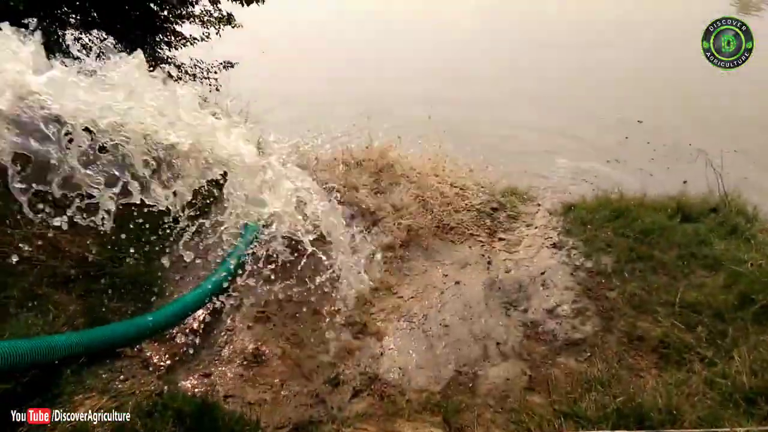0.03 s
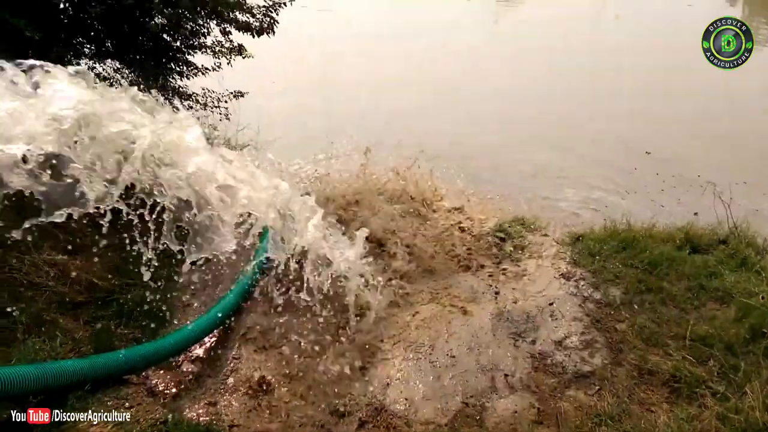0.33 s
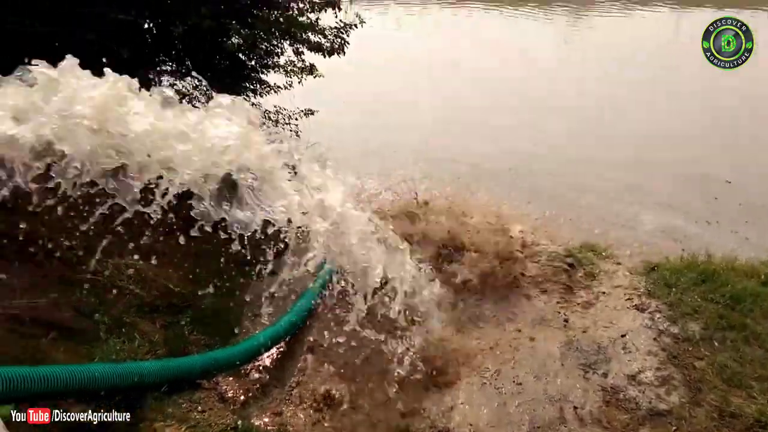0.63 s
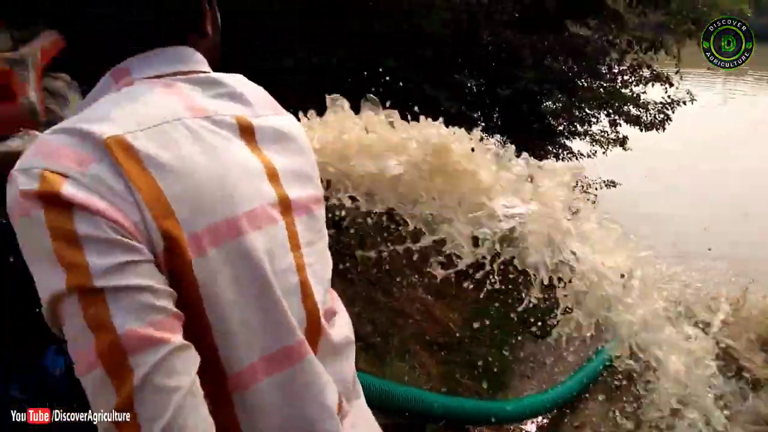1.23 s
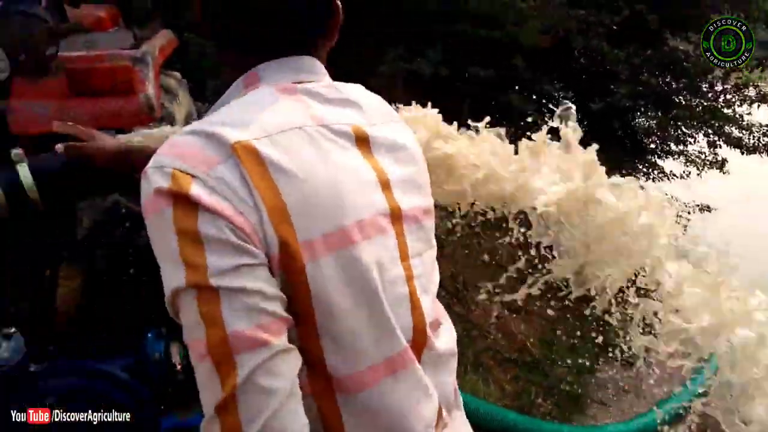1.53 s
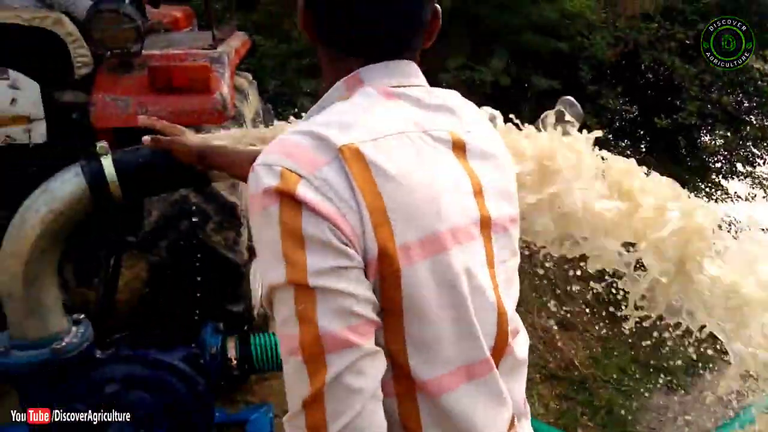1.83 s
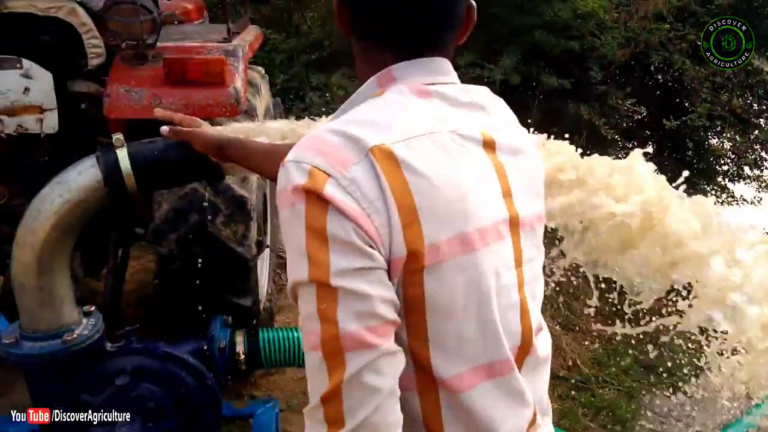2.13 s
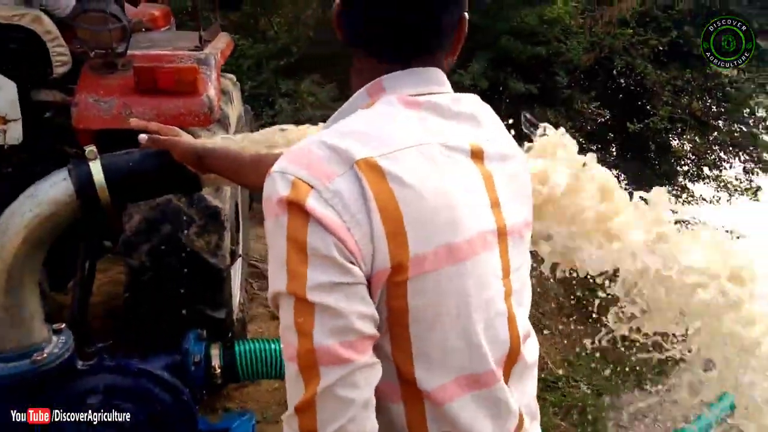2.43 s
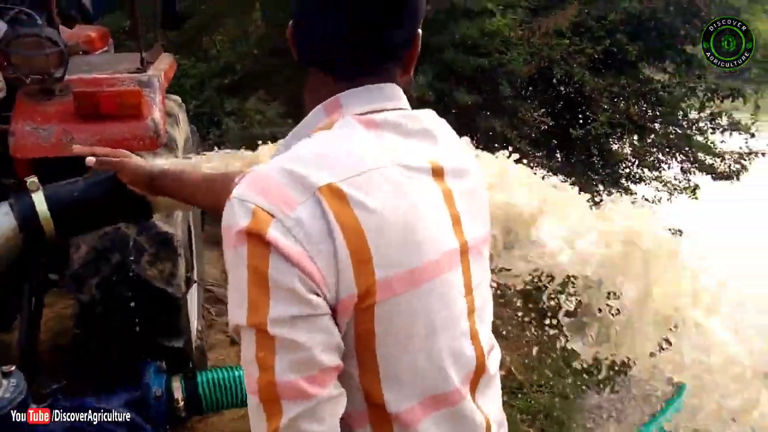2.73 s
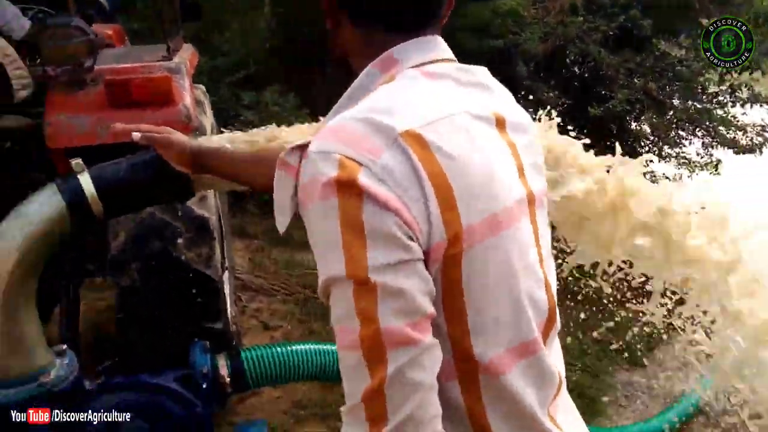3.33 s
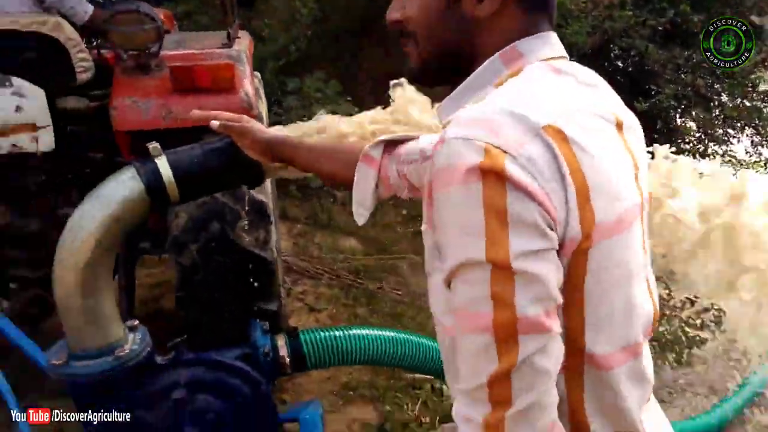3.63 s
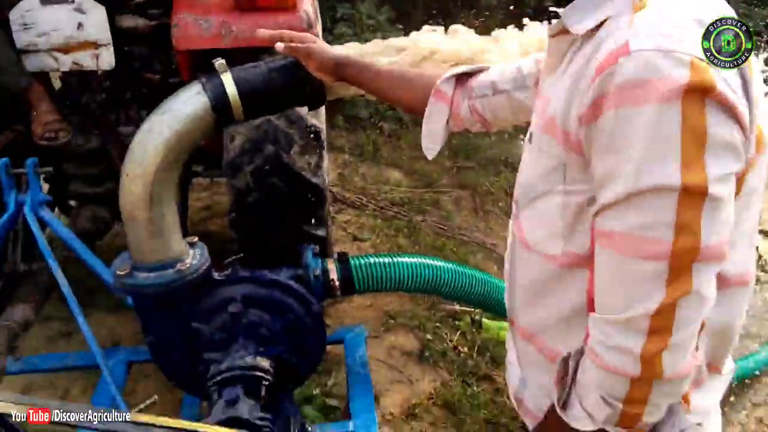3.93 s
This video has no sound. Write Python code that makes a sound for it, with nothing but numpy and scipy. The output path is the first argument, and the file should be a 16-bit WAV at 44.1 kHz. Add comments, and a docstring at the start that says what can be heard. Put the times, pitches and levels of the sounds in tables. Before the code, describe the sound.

A diesel tractor engine runs with a steady clatter and thud, driving a pump whose water jet gushes and spatters onto mud outdoors. The tone shifts as the microphone moves closer, and the engine speeds up slightly near the end.

```python
"""Beside a pond, a three-cylinder diesel tractor drives a water pump and speeds up a little after 3 s.
Firing pulses thud in the exhaust over a rumble and hum, knocks set the block clattering, and gears whine.
A thick jet gushes from the pipe, spattering on the mud and churning up bubbles. Clatter and spray change
colour as the listener walks from the pond's edge to behind a man's back and on towards the pump."""
import sys
import numpy as np
from scipy import signal
from scipy.fft import rfft, irfft, next_fast_len
from scipy.io import wavfile
from scipy.ndimage import uniform_filter1d, map_coordinates

SR = 44100
rng = np.random.default_rng(int(sys.argv[2]) if len(sys.argv) > 2 else 0)


def store_wav(level_fs):
    """Save 16-bit WAV to argv[1]."""
    pcm = np.round(np.clip(np.atleast_2d(level_fs), -1, 1) * 32767)
    wavfile.write(sys.argv[1], SR, pcm.T.astype(np.int16))


N = 176400
CYLINDERS, TOP_HZ = 3, 15550


def amp(db):
    """Decibels to gain."""
    return 10 ** (np.asarray(db) / 20)


def unit(x):
    """Scale to rms 1."""
    return x / np.sqrt(np.mean(x ** 2) + 1e-20)


def curve(rows):
    """Automation: (time_s, value) rows to one value per sample."""
    return np.interp(np.arange(N) / SR, *np.transpose(rows))


def wobble(rate_hz):
    """A smooth random drift."""
    knots = rng.standard_normal(2048)
    return map_coordinates(knots, [np.arange(N) * rate_hz / SR], mode="mirror")


def filtered(x, response):
    """Apply a gain that depends on frequency."""
    size = next_fast_len(N + SR // 2)
    return irfft(rfft(x, size) * response(np.fft.rfftfreq(size, 1 / SR)), size)[:N]


def coloured(x, eq):
    """EQ through (pitch_hz, gain_db) points, silent beyond both ends, at rms 1."""
    points_hz, db = np.transpose(eq)

    def response(hz):
        inside = (hz >= points_hz[0]) * (hz <= points_hz[-1])
        return amp(np.interp(np.log(hz + 1), np.log(points_hz + 1), db)) * inside
    return unit(filtered(x, response))


def resonant(x, modes):
    """Bell EQs at (pitch_hz, width_hz, lift_db) resonances."""
    return filtered(x, lambda hz: amp(sum(db / (1 + (2 * (hz - pitch_hz) / width_hz) ** 2)
                                          for pitch_hz, width_hz, db in modes)))


def lifted(x, lift_db, centre_hz, width_hz):
    """Ride one band up and down over time."""
    band = filtered(x, lambda hz: np.exp(-(2 * (hz - centre_hz) / width_hz) ** 2))
    return x + (amp(curve(lift_db)) - 1) * band


def reflected(x, delay_ms, gain):
    """Add one reflection whose delay glides; the mix is at rms 1."""
    late = map_coordinates(x, [np.arange(N) - curve(delay_ms) * SR / 1000], mode="mirror")
    return unit(x + gain * late)


# Engine speed: time_s, firing_rate_hz
ENGINE_SPEED = [(0, 23.53), (0.9, 23.58), (1.7, 23.74), (2.8, 23.71), (3.1, 24.31), (3.35, 25.85),
                (3.65, 26.44), (4, 26.53)]


def engine_cycle():
    """Working cycles elapsed at each sample; every cylinder fires once per cycle."""
    return np.cumsum(curve(ENGINE_SPEED)) / SR / CYLINDERS


def blows(cycle, cylinders_db, t60_s, repeat, scatter_db):
    """One decaying burst per firing; the share `repeat` is the cylinder's own ring, the rest is new."""
    length = SR // 4
    own_ring = rng.standard_normal((CYLINDERS, length))
    fresh, accents = rng.standard_normal((128, length)), rng.standard_normal(128)
    decay = amp(-60 * np.arange(length) / SR / t60_s)
    firings = np.flatnonzero(np.diff(np.floor(cycle * CYLINDERS)))
    earlier = firings[0] - (firings[1] - firings[0]) * np.arange(CYLINDERS, 0, -1)  # already running
    track = np.zeros(N + 2 * length)
    for k, start in enumerate(np.r_[earlier, firings] + length):
        burst = np.sqrt(repeat) * own_ring[k % CYLINDERS] + np.sqrt(1 - repeat) * fresh[k]
        strength = amp(cylinders_db[k % CYLINDERS] + scatter_db * accents[k])
        track[start:start + length] += strength * decay * burst
    return unit(track[length:][:N])


def grind(cycle, repeat):
    """Even machine noise; the higher `repeat`, the more of it loops with each working cycle."""
    loop = rng.standard_normal(SR // 16)
    locked = unit(map_coordinates(loop, [cycle % 1 * len(loop)], mode="grid-wrap"))
    return unit(np.sqrt(repeat / 2) * locked + np.sqrt(1 - repeat) * rng.standard_normal(N))


# The silencer's boxy tone: pitch_hz, gain_db
THUD_EQ = [(120, -36), (190, -17), (245, -2.5), (290, 2.5), (340, 1), (385, -2), (440, -1), (500, -11),
           (600, -20), (900, -45)]
# Thud fader: time_s, level_db
THUD_FADER = [(0, -34.5), (1.2, -34.5), (1.7, -33), (2.1, -34.5), (2.8, -33.5), (3.5, -33), (4, -33.5)]


def exhaust_thud(cycle):
    """Firing pulses thud in the silencer over a bed of machine noise."""
    pulses = blows(cycle, cylinders_db=[0, 3.5, 1], t60_s=0.14, repeat=0.25, scatter_db=-1.0)
    thud = coloured(pulses + amp(6.5) * grind(cycle, repeat=0.34), THUD_EQ)
    return amp(curve(THUD_FADER) - 0.03) * thud


# The exhaust's low end: pitch_hz, gain_db
RUMBLE_EQ = [(15, -45), (35, -33), (60, -26), (100, -19), (145, -9), (175, -4.5), (215, -3.5), (255, 2),
             (310, -15), (400, -38)]
# Rumble fader: time_s, level_db
RUMBLE_FADER = [(0, -50.5), (1.2, -45.5), (2, -50), (2.8, -45.5), (3.4, -40.5), (4, -41)]


def exhaust_rumble(cycle):
    """Low exhaust noise, pushed up as the engine gains speed."""
    return amp(curve(RUMBLE_FADER) + 1.0) * coloured(grind(cycle, repeat=0.29), RUMBLE_EQ)


def tones(cycle, partials, waver_db, drift_rad):
    """Slightly unsteady sines locked to the engine's cycle."""
    mix = np.zeros(N)
    for multiple, db in partials:
        peak = np.sqrt(2) * amp(db + waver_db * wobble(4.3))
        phase = 2 * np.pi * (multiple * cycle + rng.random())
        mix += peak * np.sin(phase + drift_rad * wobble(6.7))
    return mix


# Hum partials going into the pipe: cycle_multiple, level_db
HUM_PARTIALS = [(6, -63), (9, -60), (12, -57.5), (13, -66.5), (14, -70), (15, -65.5), (16, -63), (18, -61),
                (21, -56.5), (24, -58.5)]
# Exhaust pipe resonance: pitch_hz, width_hz, lift_db
PIPE_RESONANCE = [(115.5, 6.4, 9.5)]


def exhaust_hum(cycle):
    """The pipe favours whichever partial passes its resonance; the hum swells gently with the rumble."""
    rumble_db = curve(RUMBLE_FADER)
    hum = resonant(tones(cycle, HUM_PARTIALS, waver_db=1.0, drift_rad=0.05), PIPE_RESONANCE)
    return amp(0.3 * (rumble_db - rumble_db.mean())) * hum


# The listener's walk: time_s, place (0 pond, 1 behind the man, 2 pump)
LISTENER_PATH = [(0, 0.14), (.95, 0.23), (1.6, 0.7), (2.65, 1.17), (3.2, 1.4), (3.7, 1.7), (4, 1.86)]


def walked(perspectives):
    """Cross-fade a sound's three perspectives along the walk."""
    place = curve(LISTENER_PATH)
    return sum(np.clip(1 - abs(place - k), 0, 1) * x for k, x in enumerate(perspectives))


def surge(cycle):
    """A swing from -1 to 1 that peaks 0.64 of the way through each working cycle."""
    return np.cos(2 * np.pi * (cycle - 0.64))


# Narrow rings of the engine's castings: pitch_hz, width_hz, pond_lift_db, behind_lift_db, pump_lift_db
CASTING_MODES = [(710, 50, -2.5, 0.8, 1.5), (858, 22, -2, 1.8, -2), (1075, 57, 6, 0.82, 5.5),
                 (1202, 16, 9.5, 3, 3.5), (1264, 16, 6, 0.5, 3), (1329, 19, 11, 3.5, 9),
                 (1590, 19, -1, 2.2, 7), (1680, 28, 4, 2.7, 2.5), (1859, 70, 6.5, 3, 6),
                 (2097, 45, 4.5, 5, 10), (2400, 80, 3, 2.7, 2), (2900, 68, -3, 6, 9)]
# Clatter tone at each place: pitch_hz, gain_db
CLATTER_POND_EQ = [(290, -36), (500, -12), (535, -9.5), (690, -11.5), (750, -7.5), (826, -12.5), (989, -8),
                   (1240, -2.5), (1320, -4), (1400, -11), (1520, -5), (1650, -9), (1880, -6.5),
                   (2190, -14.5), (3000, -27.5), (3900, -54), (6600, -120)]
CLATTER_BEHIND_EQ = [(290, -50), (500, -21.5), (527, -15.5), (577, -15), (665, -10), (722, -4), (790, -11),
                     (864, -5.5), (1100, -6), (1260, -3.5), (1370, -2), (1620, -3.5), (1760, -9),
                     (2020, -7), (3000, -28), (3900, -67), (6600, -120)]
CLATTER_PUMP_EQ = [(290, -41), (500, -21), (640, -10), (738, -9.5), (911, -9), (982, -18), (1070, -2.5),
                   (1300, -2.5), (1370, -3.5), (1490, -12), (1570, -8), (1830, -8.5), (2310, -16),
                   (2490, -21.5), (3000, -29), (3900, -55), (6600, -120)]
# The engine's bounce off the ground: time_s, delay_ms
GROUND_BOUNCE = [(0, 4), (1, 4.1), (2, 3.71), (2.8, 3.3), (3.4, 3.9), (4, 4)]
# Ride on the clatter's upper ring: time_s, lift_db
RING_RIDE = [(0, 1), (1, 1.5), (1.8, -2), (2.3, 0.5), (2.9, 2), (3.4, 1.2), (4, -3)]
# Clatter fader: time_s, level_db
CLATTER_FADER = [(0, -20.5), (0.08, -22), (0.15, -21.5), (0.22, -21.5), (0.37, -20.5), (0.55, -21.5),
                 (0.7, -21), (0.83, -22.5), (0.97, -21), (1.05, -22), (1.2, -21.3), (1.8, -21.5),
                 (2.15, -22), (2.76, -22), (2.88, -21), (3.06, -20.5), (3.2, -22), (3.24, -21), (3.55, -20),
                 (3.66, -21), (3.73, -19.9), (4, -20)]


def block_clatter(cycle):
    """Diesel knocks and the grind of the drive ring the block; each place favours other castings."""
    knocks = blows(cycle, cylinders_db=[2, 3, -2], t60_s=0.38, repeat=0.37, scatter_db=0.95)
    drive = knocks + amp(4.5) * grind(cycle, repeat=0.4)
    perspectives = []
    for place, eq in enumerate([CLATTER_POND_EQ, CLATTER_BEHIND_EQ, CLATTER_PUMP_EQ]):
        modes = [(hz, width_hz, lifts_db[place]) for hz, width_hz, *lifts_db in CASTING_MODES]
        perspectives.append(coloured(resonant(drive, modes), eq))
    clatter = reflected(walked(perspectives), GROUND_BOUNCE, gain=0.078)
    clatter = lifted(clatter, RING_RIDE, centre_hz=2040, width_hz=950)
    flutter_db = 0.5 * surge(cycle) + 0.48 * wobble(60)
    return amp(curve(CLATTER_FADER) + flutter_db - 0.5) * clatter


# Gear partials: cycle_multiple, level_db
GEAR_PARTIALS = [(108, -47), (161, -62), (168, -60)]


def gear_whine(cycle):
    """The gears sing thin, wavering tones that rise with engine speed."""
    return tones(cycle, GEAR_PARTIALS, waver_db=3.0, drift_rad=0.92)


def drops(count, pitch_hz, spread, q, accent_db, rise, length):
    """A shower of tiny damped rings of random pitch and strength, each `length` samples long."""
    starts = rng.integers(0, N, (count, 1))
    hz = np.minimum(pitch_hz * np.exp(spread * rng.standard_normal((count, 1))), TOP_HZ)
    accents = np.minimum(rng.exponential(size=(count, 1)), 4)
    strength = amp(accent_db * accents) * np.sqrt(hz / pitch_hz)
    age = np.arange(length)
    turns = hz * age / SR
    rings = strength * np.exp(-np.pi * turns / q) * np.sin(2 * np.pi * turns * (1 + rise * turns / q))
    return unit(np.bincount((starts + age).ravel(), rings.ravel())[:N])


def patchy(x, depth_db):
    """Flickering colour: patches of random gain, a few hundred Hz wide and about 0.1 s long."""
    spectrogram = signal.stft(x, nperseg=512)[2]
    patches = uniform_filter1d(rng.standard_normal(spectrogram.shape), 4, axis=0)
    patches = uniform_filter1d(patches, 22, axis=1)
    return signal.istft(spectrogram * amp(depth_db * unit(patches)), nperseg=512)[1][:N]


# Spray tone at each place: pitch_hz, gain_db
SPRAY_POND_EQ = [(2000, -16), (2900, -5), (3300, -0.5), (4100, -1.1), (5000, -1), (5700, -6.3),
                 (6500, -7.5), (7600, -19.5), (9200, -13.5), (11000, -15.5), (13000, -19), (15400, -26)]
SPRAY_BEHIND_EQ = [(2000, -11), (2900, -6.5), (3300, -3), (4100, -5), (5000, -4), (5700, -3), (6500, -9),
                   (7600, -15), (9200, -17.5), (11000, -18.5), (13000, -20.5), (15400, -22.5)]
SPRAY_PUMP_EQ = [(2000, -30), (2900, -7), (3300, -0.5), (4100, -5), (4600, -4), (5000, -1.5), (5700, -11.5),
                 (6500, -10), (7600, -19), (9800, -19.8), (12300, -26), (14000, -24), (15400, -24)]
# The spray's bounce off a close surface: time_s, delay_ms
CLOSE_BOUNCE = [(0, 0.22), (.8, 0.22), (1.3, 0.19), (1.8, 0.19), (2.6, .18), (3.1, 0.22), (3.7, 0.22),
                (4, 0.12)]
# Ride on the spray's top fizz: time_s, lift_db
FIZZ_RIDE = [(0, -1.5), (.8, 1), (1.3, 2.8), (1.7, 0.5), (2.1, -0.5), (4, 2)]
# Splash fader: time_s, level_db
SPLASH_FADER = [(0, -40), (0.4, -40), (0.55, -41), (0.95, -40.5), (1.05, -42), (1.25, -42), (1.4, -41),
                (1.75, -42.5), (1.87, -41), (2.2, -41), (2.3, -42.5), (2.38, -41), (2.65, -41.5),
                (2.72, -41.61), (3.0, -42.13), (3.1, -40.5), (3.7, -42), (3.94, -39.5), (4, -38)]


def jet_splash(cycle):
    """The jet breaks up in lumps and spatters on the mud; its hiss surges once per engine cycle."""
    spatter = drops(count=9000, pitch_hz=7600, spread=0.58, q=1.2, accent_db=3.5, rise=0, length=64)
    hiss = patchy(amp(6.5) * rng.standard_normal(N) + spatter, depth_db=1.3)
    spray = walked([coloured(hiss, eq) for eq in (SPRAY_POND_EQ, SPRAY_BEHIND_EQ, SPRAY_PUMP_EQ)])
    spray = reflected(spray, CLOSE_BOUNCE, gain=0.16)
    spray = lifted(spray, FIZZ_RIDE, centre_hz=11500, width_hz=10000)
    lumps_db = 1.15 * wobble(130) + 0.87 * surge(cycle)
    return amp(curve(SPLASH_FADER) + lumps_db - 0.08) * spray


# Body of the churning water: pitch_hz, gain_db
GUSH_EQ = [(200, -4), (500, -6), (1000, -3), (1900, -6), (2600, -13), (4000, -45)]


def jet_gush():
    """Bubbles churn where the jet lands, each chirping upwards as it dies."""
    bubbles = drops(count=3600, pitch_hz=1100, spread=0.434, q=10.5, accent_db=2.0, rise=0.059, length=900)
    return amp(-33 + wobble(12)) * coloured(bubbles, GUSH_EQ)


def scene():
    """Engine and water run together throughout, in mono."""
    cycle = engine_cycle()
    exhaust = exhaust_thud(cycle) + exhaust_rumble(cycle) + exhaust_hum(cycle)
    tractor = exhaust + block_clatter(cycle) + gear_whine(cycle)
    return (tractor + jet_splash(cycle) + jet_gush())[None]


def record(dry):
    """A brick-wall high cut on the mix."""
    return filtered(dry[0], lambda hz: hz < TOP_HZ)[None]


dry = scene()
out = record(dry)
store_wav(out)
```